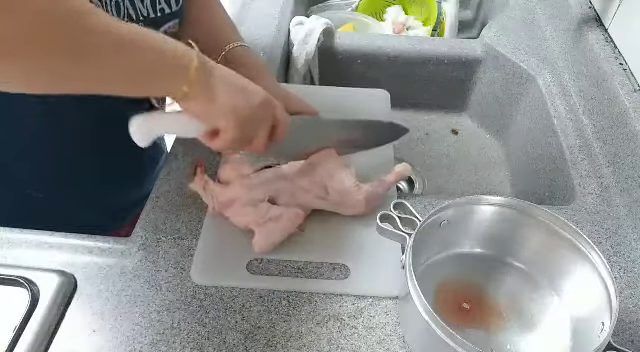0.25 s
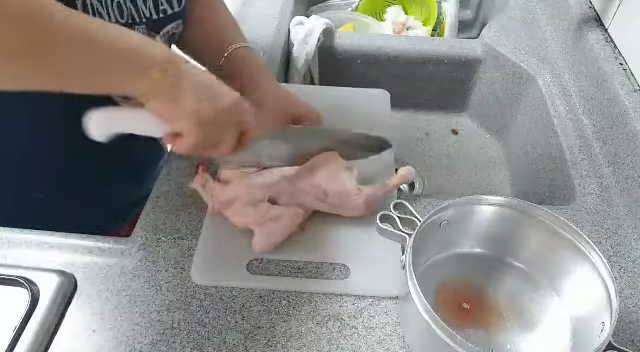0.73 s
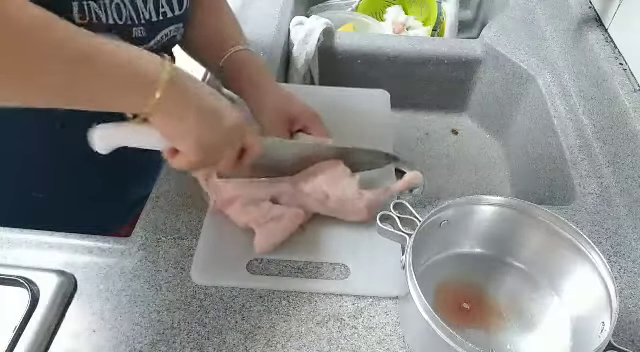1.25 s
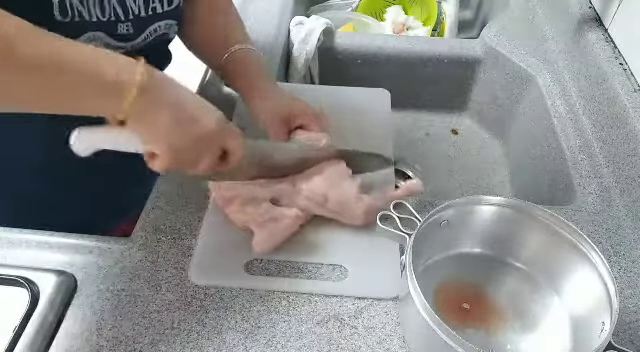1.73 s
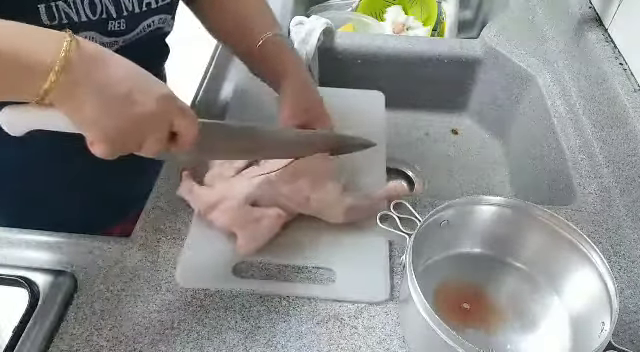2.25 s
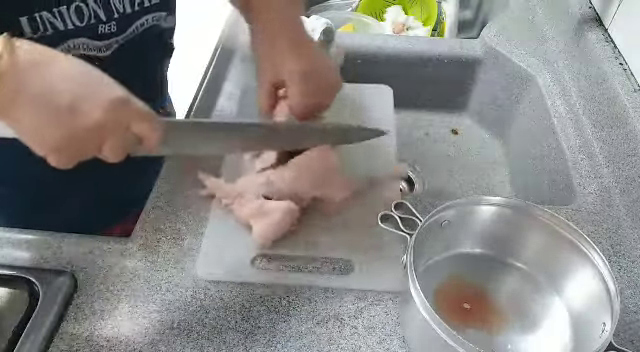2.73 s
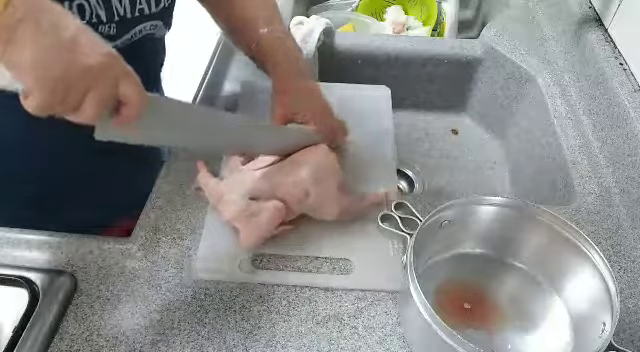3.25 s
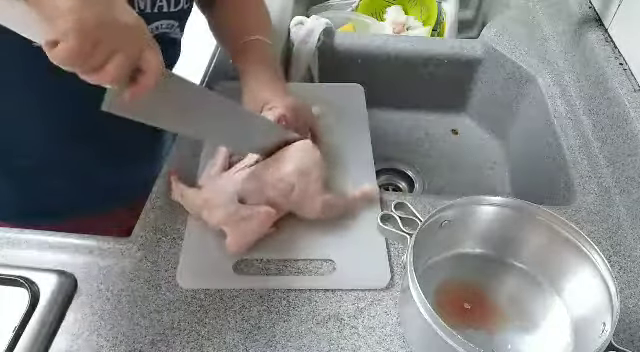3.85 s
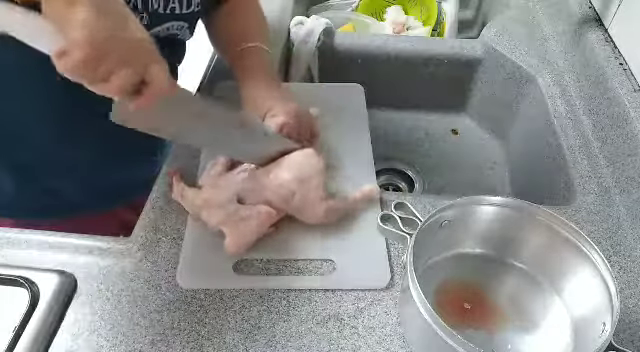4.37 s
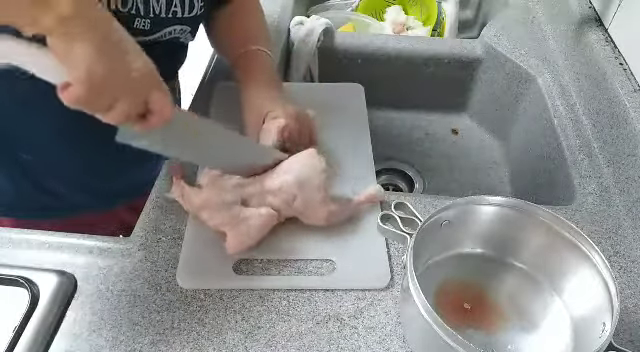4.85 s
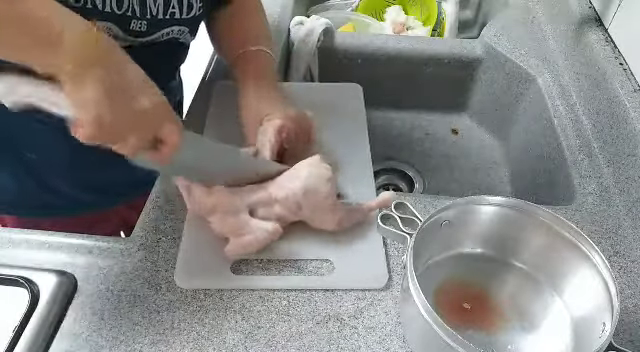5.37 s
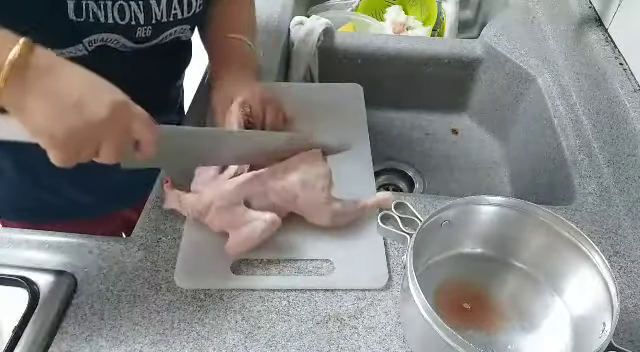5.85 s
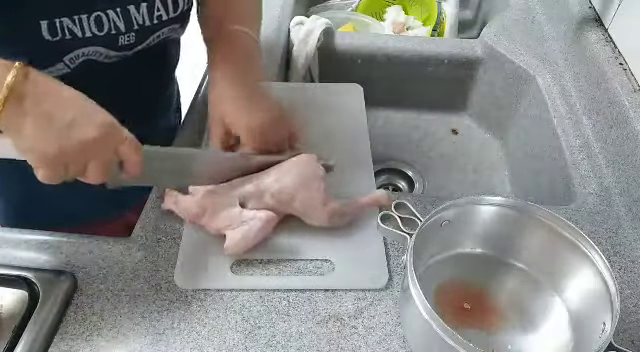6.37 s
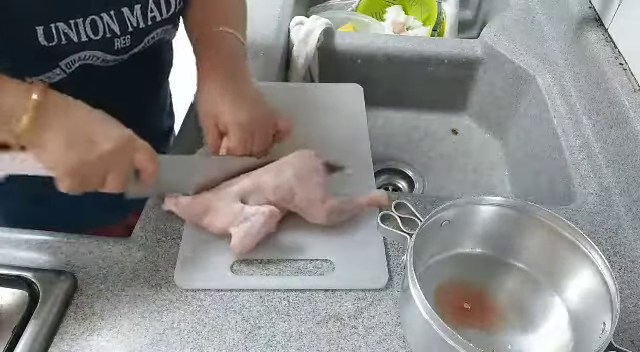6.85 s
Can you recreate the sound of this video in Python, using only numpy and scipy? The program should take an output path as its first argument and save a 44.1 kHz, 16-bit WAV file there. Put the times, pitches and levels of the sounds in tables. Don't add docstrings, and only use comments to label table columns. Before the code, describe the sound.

Over a soft kitchen hum, raw meat is cut with scratchy wet strokes, irregular board knocks, gristle ticks and one sharp bone snap.

```python
import sys
import numpy as np
from scipy import signal
from scipy.fft import rfft, irfft
from scipy.io import wavfile
from scipy.ndimage import uniform_filter1d

SR = 44100
rng = np.random.default_rng(int(sys.argv[2]) if len(sys.argv) > 2 else 0)


def makeup_ratio(level_db):
    decades = np.asarray(level_db, float) / 20
    return 10 ** decades


def int16_out(signal):
    q = np.round(np.clip(np.atleast_2d(signal).T, -1, 1) * 32767)
    wavfile.write(sys.argv[1], SR, q.astype(np.int16))


N = 313506
SPLIT_HZ = 8040


def rms_one(x):
    return x / np.sqrt(np.mean(x ** 2) + 1e-20)


def at_hz(points, hz):
    table_hz, value = np.array(points).T
    return np.interp(np.log(hz + 1), np.log(table_hz), value)


def coloured(spectrum, size=N):
    hz = np.fft.rfftfreq(size, 1 / SR)
    return rms_one(irfft(rfft(rng.standard_normal(size)) * makeup_ratio(at_hz(spectrum, hz)), size))


def band(x, low_hz, high_hz):
    return signal.sosfilt(signal.butter(2, [low_hz, min(high_hz, .45 * SR)], "band", fs=SR, output="sos"), x)


def resonance(x, hz, width_hz):
    r = np.exp(-np.pi * width_hz / SR)
    return signal.lfilter([(1 - r * r) / 2, 0, (r * r - 1) / 2], [1, -2 * r * np.cos(2 * np.pi * hz / SR), r * r], x)


def flicker(rate_hz):
    r = np.exp(-2 * np.pi * rate_hz / SR)
    return rms_one(signal.lfilter([1], [1, -2 * r, r * r], rng.standard_normal(N + SR))[SR:])


def patchy(x, gains_of):
    _, _, cells = signal.stft(x, nperseg=512)
    gains = gains_of(rng.random((33, cells.shape[1] // 4 + 1)))
    gains = np.kron(gains, np.ones((8, 4)))[:len(cells), :cells.shape[1]]
    return signal.istft(cells * gains, nperseg=512)[1][:N]


def add(out, s, sound):
    at = round(s * SR)
    out[at:at + len(sound)] += sound[:N - at]


def hum():
    # frequency [Hz], level [dB per Hz].
    rumble = [(15, -63), (25, -40), (97, 0), (159, -0.5), (202, -7), (368, -8.5), (483, -13), (1010, -16.5),
              (1390, -28), (1680, -16.5), (2460, -29), (4360, -29), (6380, -24), (14400, -32.5),
              (16500, -32)]
    # frequency [Hz], width [Hz], level [dB].
    whine_bands = [(1525, 200, -75.5), (6300, 140, -101.5), (8200, 270, -81), (10200, 670, -82),
                   (14350, 800, -80.5)]
    whine = sum(makeup_ratio(db) * rms_one(resonance(rng.standard_normal(N), hz, width_hz))
                for hz, width_hz, db in whine_bands)
    return makeup_ratio(-61 + .5 * flicker(9.2)) * coloured(rumble) + whine


def stray(mid):
    # frequency [Hz], level [dB per Hz].
    stray_spectrum = [(18, -43), (30, 2), (157, -9.5), (384, -5.5), (962, -5), (1960, -6), (2120, -5),
                      (4300, -2.5), (16000, -2)]
    side_db, mask_db = -73.5, -40.5
    silent_share, follows = .3, 1.1
    loudness = uniform_filter1d(mid ** 2, size=1024) / makeup_ratio(mask_db) ** 2
    patches = patchy(coloured(stray_spectrum), lambda draw: draw > silent_share)
    return makeup_ratio(side_db) * patches * np.sqrt(1 + follows * loudness) / (1 + loudness ** 4)


def kitchen(x):
    # frequency [Hz], t60 [s], level [dB].
    decay = [(100, 0.22, 18), (244, 0.56, 1.5), (690, 0.33, -1.5), (1500, 0.42, 0), (3000, 0.35, -3),
             (6000, 0.34, -4), (12000, 0.18, -3)]
    t, tail = np.arange(SR // 2) / SR, 0
    for low_hz in 60 * 2. ** np.arange(8):
        noise = band(rng.standard_normal(len(t)), low_hz, 2 * low_hz)
        level_db = at_hz(np.array(decay)[:, ::2], 1.4 * low_hz)
        t60 = at_hz(np.array(decay)[:, :2], 0.91 * low_hz)
        tail = tail + noise * makeup_ratio(level_db - 60 * t / t60)
    tail = tail * np.clip((t - .003) / 0.008, 0, 1)
    return signal.fftconvolve(x, tail / np.sqrt(np.sum(tail ** 2)))[:N]


def struck(hits, modes, spread_db, turns, crack_hz, crack_low_hz=380):
    out, t = np.zeros((2, N)), np.arange(SR // 2) / SR
    hz, level_db, t60 = np.transpose(modes)[:, :, None]
    swing = (1 - np.exp(-t * hz / turns)) * makeup_ratio(-np.minimum(60 * t / t60, 200)) * np.sin(2 * np.pi * hz * t)
    chance = rng.standard_normal((len(hits), len(modes), 1))
    edge = signal.butter(6, 11500, fs=SR, output="sos")
    crack_shape = (1 - np.exp(-t / 0.0067)) * makeup_ratio(-60 * t / 0.036)
    for (s, db, crack_db, cut_hz), luck in zip(hits, chance):
        strength = makeup_ratio(level_db + spread_db * luck) / np.sqrt(1 + (hz / cut_hz) ** 4)
        noise = signal.sosfilt(edge, band(rng.standard_normal(len(t)), crack_low_hz, crack_hz))
        add(out[0], s, makeup_ratio(db - 7.5) * np.sum(strength * swing, axis=0))
        add(out[1], s, makeup_ratio(crack_db) * rms_one(noise) * crack_shape)
    return out


def tapped(hits, modes):
    out, t = np.zeros(N), np.arange(SR // 5) / SR
    hz, level_db, t60 = np.transpose(modes)[:, :, None]
    swing = makeup_ratio(level_db - 60 * t / t60) * (1 - np.exp(-t * hz / 1.1)) * np.sin(2 * np.pi * hz * t)
    ring = np.sum(swing, axis=0)
    for s, db in hits:
        add(out, s, makeup_ratio(db) * ring)
    return out


def pings(rows, thin_hz=0):
    out = np.zeros(N)
    for s, db, hz, t60 in rows:
        t = np.arange(round(2 * t60 * SR)) / SR
        add(out, s, makeup_ratio(db + 4.5 - 60 * t / t60) * (1 - np.exp(-t * hz / 2.3)) * np.sin(2 * np.pi * hz * t))
    return np.diff(out, prepend=0) * SR / (2 * np.pi * thin_hz) if thin_hz else out


def meat_thumps():
    # start [s], peak [dB], crack [dB], contact cut-off [Hz].
    thumps = [
        (.94, -41, -80, 150),
        (3.020, -32.5, -85, 307),
        (3.0333, -36, -85, 300),
        (3.040, -44, -85, 300),
        (4.565, -42, -80, 200),
        (4.59, -41.5, -80, 200),
        (5.99, -65, -78, 300),
        (6.29, -67, -73, 300),
        (6.80, -58, -68, 400),
    ]
    # frequency [Hz], level [dB], t60 [s].
    basin = [(147, 11, 0.042), (200, 9, 0.04), (390, -5, .05)]
    return struck(thumps, basin, 1.0, turns=0.61, crack_hz=3000)


def board_knocks():
    # start [s], peak [dB], crack [dB], contact cut-off [Hz].
    knocks = [
        (0.565, -24.5, -30, 1500),
        (0.981, -28.5, -54, 1500),
        (1.315, -33.5, -32, 1500),
        (2.273, -49.5, -54, 1500),
    ]
    # frequency [Hz], level [dB], t60 [s].
    board = [(120, -2.5, 0.086), (150, 1, 0.074), (243, 9.5, 0.07), (545.6, 0, 0.088), (900, 12, 0.019),
             (963, -4.5, 0.083), (1500, 16, 0.011), (2210, -1, 0.041), (2790, -10, 0.1)]
    return struck(knocks, board, 0.97, turns=2.83, crack_hz=3500)


def rim_slaps():
    # start [s], peak [dB], crack [dB], contact cut-off [Hz].
    slaps = [
        (2.703, -23, -24, 3000),
        (2.709, -38, -34, 3000),
        (2.716, -32, -35, 1000),
        (2.727, -23, -32, 900),
    ]
    # frequency [Hz], level [dB], t60 [s].
    rim = [(150, -0.5, 0.057), (234.4, -4, 0.11), (345, -5.5, 0.036), (453, -17.5, 0.21), (554, 1.5, 0.047),
           (627, -6.5, 0.16), (678, 1.5, 0.11), (746, 1, 0.031), (1000, -7, 0.022), (1310, -2.5, 0.03),
           (1570, 1.5, 0.034), (2500, -13, 0.028)]
    return struck(slaps, rim, 1.0, turns=1.9, crack_hz=10600)


def booms():
    # start [s], peak [dB], pitch [Hz], t60 [s].
    boom_events = [(.5652, -33, 880, .03), (.9635, -41, 944, .03), (.981, -51, 87, .12),
                   (.986, -36, 547, .06), (1.266, -49, 1000, .04), (1.288, -56, 1000, .08),
                   (1.316, -43.5, 108, .15), (2.73, -42, 645, 0.15), (2.765, -45.5, 690, .15),
                   (2.275, -57, 793, .08), (3.020, -46, 192, .04), (5.4545, -19, 2130, 0.0042),
                   (5.455, -32.5, 271, 0.064), (5.458, -29, 615, .08), (5.4722, -21, 7050, .012),
                   (5.50, -43, 1240, .06), (5.51, -41, 710, .12), (5.54, -43, 150, .1),
                   (6.295, -56, 129, .08), (6.778, -42.5, 934, .05)]
    return pings(boom_events)


def heel_taps():
    # start [s], peak [dB].
    taps = [
        (.0972, -39),
        (.0995, -52),
        (.141, -45),
        (.1525, -43),
        (.207, -49.5),
        (.522, -48),
        (.537, -42),
    ]
    # frequency [Hz], level [dB], t60 [s].
    heel = [(895, 4.5, 0.025), (1656, -2, 0.024), (2374, -12, 0.028), (2660, -16, 0.033)]
    return tapped(taps, heel)


def bone_break():
    # start [s], peak [dB], crack [dB], contact cut-off [Hz].
    breaks = [
        (5.4525, -15.5, -27, 2000),
        (5.4570, -14.5, -20.5, 2500),
        (5.460, -29, -51, 2500),
    ]
    # frequency [Hz], level [dB], t60 [s].
    bone = [(140, -7.5, 0.12), (210, -5, 0.037), (659, -35, 0.029), (860, -5, 0.01), (870, -5, 0.024),
            (1000, -11, 0.014), (1106, 2, 0.013), (1250, -4.5, 0.025), (1730, -1, 0.0089),
            (1850, -4, 0.012), (2200, 10, 0.0088), (4400, -2, 0.0082)]
    return struck(breaks, bone, 0.83, turns=0.36, crack_hz=2000)


def bone_snap():
    centre_s, width_s, lean = 5.45672, .00019, .25
    t = (np.arange(N) / SR - centre_s) / width_s
    return makeup_ratio(-7.5) * (t ** 2 - 1 - lean * t) * np.exp(-.5 * t ** 2)


def bone_splinters():
    # start [s], peak [dB].
    splinters = [
        (5.4535, -25.5),
        (5.464, -31),
        (5.469, -35),
        (5.477, -42),
        (5.503, -38),
    ]
    # frequency [Hz], level [dB], t60 [s].
    shard = [(660, 0, 0.05), (783, 4, 0.026), (1050, 8.5, 0.019), (1677, 2.5, 0.042), (2191, -4, 0.02),
             (3470, -3, 0.02), (4430, -8, 0.016)]
    return tapped(splinters, shard)


def steel_chatter():
    # start [s], peak [dB], crack [dB], contact cut-off [Hz].
    chatter = [
        (5.4668, -21.5, -38, 12000),
        (5.470, -18.5, -36, 12000),
        (5.478, -24, -20, 12000),
        (5.486, -25.5, -31, 12000),
        (5.495, -36, -22.5, 12000),
        (5.503, -37, -18, 12000),
    ]
    # frequency [Hz], level [dB], t60 [s].
    steel = [(2950, 1.5, 0.024), (3556, 3.5, 0.025), (5440, -18, 0.021), (6020, -6, 0.048),
             (7005, 6, 0.035), (7150, 15.5, 0.011), (7800, 0, 0.0244), (8270, -12.5, 0.075)]
    return struck(chatter, steel, 0.7, turns=3.8, crack_hz=9100, crack_low_hz=2440)


def fibre_pricks():
    # start [s], peak [dB], pitch [Hz].
    pricks = [(0.1684, -39, 10770), (0.2173, -35, 14560), (0.5585, -29, 14380), (0.5613, -31, 14040),
              (0.9024, -35, 9820), (0.9075, -34, 8700), (0.9097, -34, 13870), (1.0893, -44, 7060),
              (1.1707, -46, 5680), (1.2859, -40, 8270), (1.3136, -39, 7920), (1.3344, -33, 5250),
              (1.3622, -38, 4820), (2.7079, -25, 8790), (2.7278, -39, 7670), (2.7595, -44, 7580),
              (3.8062, -45, 7920), (3.8134, -42, 7240), (3.8273, -39, 15590), (4.5872, -24, 8180),
              (4.6075, -32, 4570), (4.6253, -23, 10590), (4.6569, -41, 8870), (5.3838, -41, 10340),
              (5.4109, -40, 11110), (5.4131, -37, 13700), (5.4225, -34, 11540), (5.4383, -29, 11970),
              (5.4547, -20, 4220), (5.5312, -30, 6890), (5.5626, -35, 6630), (5.5735, -36, 6980),
              (5.6019, -46, 6200), (6.6776, -37, 7670), (6.7362, -19, 7490), (6.7647, -32, 8610),
              (6.7707, -33, 9390), (6.7809, -25, 8350), (6.7829, -25, 9130), (6.7993, -31, 8870),
              (6.8158, -33, 6030), (6.8503, -34, 9560), (6.8612, -38, 10680), (6.8808, -43, 7410)]
    cycles = 15
    return pings([(s, db, hz, cycles / hz) for s, db, hz in pricks], thin_hz=8000)


def snags():
    # start [s], peak [dB], pitch [Hz], top [dB], knock [dB].
    gristle = [(0.0935, -53, 8910, -66, -57), (0.144, -53, 8550, -59, -55), (0.207, -36, 8500, -41, -65),
               (0.5198, -26.5, 7150, -41, -44.5), (0.527, -43, 7600, -34, -48),
               (0.555, -42, 6400, -35, -52), (0.903, -43, 8620, -36, -46.5), (0.9408, -28, 5300, -30, -49),
               (0.9638, -25, 7800, -33, -45), (1.273, -32, 8200, -48, -62), (1.333, -30, 5100, -55, -46.5),
               (1.6464, -32.5, 6200, -40.5, -56), (1.7377, -36, 7140, -46, -57.5),
               (3.8055, -40, 7100, -49, -60), (3.8188, -39, 6300, -43, -48.5),
               (4.559, -24.5, 3680, -31.5, -44.5), (4.581, -20.5, 8200, -29.5, -42),
               (4.986, -36, 8250, -45, -53), (6.7352, -18.5, 8250, -24.5, -69),
               (6.779, -21.5, 8600, -26, -56)]
    # start [s], peak [dB], pitch [Hz], top [dB].
    ticks = [(0.166, -45, 9100, -42.5), (0.2158, -37, 8400, -41.5), (2.5446, -44, 5660, -49.5),
             (2.629, -40.5, 5000, -67), (2.6563, -42, 5060, -51.5), (3.632, -48, 8370, -58),
             (3.864, -40.5, 7960, -50), (4.49, -48, 5000, -54), (4.5034, -44, 3400, -45),
             (4.62, -33, 8250, -31.5), (5.379, -56, 8510, -46.5), (6.674, -34, 6460, -51),
             (6.831, -27, 5530, -31), (7.0884, -43, 5030, -80)]
    # time [s], pitch [Hz].
    grip = [
        (0, 950),
        (.55, 895),
        (1.3, 963),
        (1.75, 1020),
        (3.82, 860),
        (4.56, 900),
        (5, 1000),
    ]
    tick_knock_db, grip_spread = -44, 0.016
    out, t = np.zeros((2, N)), np.arange(SR // 5) / SR
    shape = (1 - np.exp(-t / 0.0031)) * (makeup_ratio(-60 * t / 0.03) + 0.23 * makeup_ratio(-60 * t / 0.075))
    swell = t / .004 * np.exp(1 - t / .004)
    for s, db, hz, top_db, knock_db in gristle + [(*row, row[1] + tick_knock_db) for row in ticks]:
        knock_hz = np.interp(s, *np.transpose(grip)) * (1 + grip_spread * rng.standard_normal())
        knock = np.sin(2 * np.pi * knock_hz * t) + 0.36 * np.sin(2 * np.pi * 1.7 * knock_hz * t)
        add(out[0], s, makeup_ratio(knock_db + 2.0) * swell * knock)
        noise = rng.standard_normal((2, len(t)))
        broad = rms_one(band(noise[0], np.clip(0.81 * hz, 2800, 4800), SPLIT_HZ))
        middle = broad + 1.48 * rms_one(resonance(noise[0], hz, 400))
        top = rms_one(band(noise[1], SPLIT_HZ, 15400))
        grit = makeup_ratio(3 * np.repeat(rng.standard_normal(len(t) // 30), 30))
        add(out[1], s, shape * grit * (makeup_ratio(db - 13.5) * middle + makeup_ratio(top_db + 1.5) * top))
    return out


def songs(noise):
    # start [s], length [s], pitch [Hz], level [dB].
    song_events = [(0.106, 0.022, 1630, -57), (0.513, 0.0074, 7200, -50), (.966, 0.013, 8000, -42),
                   (1.343, 0.023, 4920, -47), (1.343, .012, 5700, -46), (1.343, .012, 4350, -48),
                   (1.36, .02, 6200, -54), (1.252, .01, 5100, -58), (1.275, .006, 8800, -52),
                   (1.297, 0.0072, 8200, -54), (4.522, .02, 3270, -52), (4.554, 0.034, 5300, -53),
                   (4.56, .04, 3990, -49), (4.584, .012, 8400, -43), (5.453, .004, 4450, -37),
                   (5.482, 0.03, 5980, -35), (5.483, 0.0074, 2890, -37), (5.522, 0.03, 7020, -44),
                   (5.555, .03, 6800, -49), (6.63, .07, 5440, -60), (6.628, .03, 4500, -64),
                   (6.735, .022, 1570, -52), (6.645, 0.02, 3600, -62), (6.66, 0.034, 4240, -59),
                   (6.672, .018, 7100, -50), (6.672, .014, 8300, -51), (6.66, .045, 5500, -56),
                   (6.672, .02, 4400, -52), (6.736, 0.07, 11000, -44), (6.736, .004, 7900, -35),
                   (6.7795, .005, 8630, -37), (6.779, .006, 3540, -50), (6.8315, .012, 5270, -43)]
    width_hz, attack_s, release_db_per_s = 320, .003, 1496.5
    out, lead = np.zeros(N), SR // 10
    for s, length, hz, db in song_events:
        t = np.arange(round((length + .08) * SR)) / SR
        near = noise[round(s * SR) - lead:][:lead + len(t)]
        line = rms_one(resonance(resonance(near, hz, width_hz), hz, width_hz))[lead:]
        release_db = release_db_per_s * np.maximum(t - length, 0)
        add(out, s, makeup_ratio(db - release_db) * np.minimum(t / attack_s, 1) * line)
    return out


def singing(hiss):
    # frequency [Hz], width [Hz], level [dB].
    blade = [(3400, 24, -16), (4340, 210, -12.5), (5170, 240, 0), (7840, 580, -4.5), (8250, 79, -18),
             (10700, 330, 0.5)]
    return sum(makeup_ratio(db + 6 * flicker(5)) * resonance(hiss, hz, width_hz) for hz, width_hz, db in blade)


def carcass(x):
    # frequency [Hz], width [Hz], level [dB].
    peaks = [(400, 1280, 1), (880, 215, 10.5), (1240, 890, -5.5), (1560, 140, 7), (2170, 450, -8)]
    signs = (-1) ** np.arange(len(peaks))
    return rms_one(sum(sign * makeup_ratio(db) * resonance(x, hz, width_hz)
                       for sign, (hz, width_hz, db) in zip(signs, peaks)))


def pressure(rows, attack_s, sag_db_per_s, release_db_per_s):
    gains = np.zeros((3, N))
    for s, length, hiss_db, top_db, body_db in rows:
        t = np.arange(round((length + .25) * SR)) / SR
        fall_db = sag_db_per_s * t + release_db_per_s * np.maximum(t - length, 0)
        shape = np.minimum(t / attack_s, 1) * makeup_ratio(-fall_db)
        for gain, db in zip(gains, (hiss_db, hiss_db + top_db, hiss_db + body_db)):
            add(gain, s, makeup_ratio(db) * shape)
    return gains


def pushes():
    # start [s], length [s], hiss [dB], top share [dB], body share [dB].
    push_events = [(0.095, 0.14, -57.5, 4.5, 2.5), (.497, 0.0076, -67, 7, -7), (0.515, 0.051, -50.5, 9, 1),
                   (0.557, 0.027, -49, -13, 3), (0.902, 0.04, -52, 9.5, 3.5), (.942, 0.045, -47, -1, 3),
                   (1.333, 0.018, -43, -16, -9), (1.645, 0.074, -54.5, -3, -4),
                   (1.737, 0.0048, -52, -17, -5), (3.8, 0.095, -63.5, -12, 2), (4.549, .01, -54, 6, -8),
                   (4.6215, 0.0046, -53, 5, -10), (4.59, 0.03, -56.5, -10, -1),
                   (4.988, 0.0077, -49, -0.5, -6), (5.38, 0.073, -62.5, 13, 2), (5.41, 0.034, -53, 9, 2.5),
                   (5.432, 0.023, -37.5, 2.5, -1), (5.457, 0.011, -34.5, -5, -8.5),
                   (5.475, 0.071, -55, -7, 14.5), (6.7355, 0.046, -40.5, -12, -9),
                   (6.779, 0.067, -41.5, -3, -7)]
    return pressure(push_events, attack_s=0.0027, sag_db_per_s=35.5, release_db_per_s=507)


def draws():
    # start [s], length [s], hiss [dB], top share [dB], body share [dB].
    draw_events = [(.325, 0.11, -66, 10, -14), (.7, 0.1, -65.5, 10.5, -4), (1.07, 0.089, -53, 3.5, -14),
                   (1.25, 0.089, -49, 2.5, -2.5), (1.47, 0.18, -61, 6, -5), (1.77, 0.13, -82, 5, -2),
                   (2.26, 0.25, -72, 4, 10), (2.53, 0.46, -66.5, 1, -2), (2.99, 0.35, -67.5, 5, 1.5),
                   (3.36, 0.15, -66, 2, -10), (3.62, 0.058, -71.5, 6, 2.5), (3.9, 0.16, -78, 10, 11),
                   (4.08, 0.18, -61.5, 1, -3), (4.31, 0.066, -62.5, -1.5, -6), (4.725, 0.1, -62, 8.5, -4),
                   (4.87, 0.15, -70, 9, 7.5), (5.02, 0.079, -70, -13, -12), (5.19, 0.1, -66.5, 6, -3),
                   (5.74, 0.086, -66, -24, -1), (6.04, .08, -83, -2, 8), (6.97, 0.085, -60.5, -2.5, -27)]
    return pressure(draw_events, attack_s=0.022, sag_db_per_s=19.5, release_db_per_s=305)


def strain():
    # moment of giving [s], climb [s], hiss [dB], top share [dB], body share [dB].
    strains = [
        (2.705, 0.013, -36.5, -13, 1.5),
        (3.82, 0.05, -57, 9, -15),
        (4.551, 0.12, -47.5, -5, -6.5),
        (4.587, 0.066, -34, -9, -5.5),
        (5.452, 0.006, -26, -16, -7.5),
        (6.684, 0.1, -44.5, -9, -12.5),
    ]
    climb_db, release_db_per_s = 33.5, 700
    gains = np.zeros((3, N))
    for s, climb, hiss_db, top_db, body_db in strains:
        t = np.arange(round((climb + .1) * SR)) / SR - climb
        shape = makeup_ratio(climb_db * np.minimum(t, 0) / climb - release_db_per_s * np.maximum(t, 0))
        for gain, db in zip(gains, (hiss_db, hiss_db + top_db, hiss_db + body_db)):
            add(gain, s - climb, makeup_ratio(db) * shape)
    return gains


def strokes():
    # frequency [Hz], level [dB per Hz].
    friction = [(1470, -14.5), (2500, -11.5), (2720, -11.5), (3630, -0.5), (4170, -4), (8400, -4.5),
                (9510, -5), (14000, -8), (16000, -9.5)]
    wet_db = 4
    grain = makeup_ratio(0.4 * flicker(87) + 1.0 * flicker(23))
    hiss = coloured(friction)
    sung = songs(hiss)
    hiss = patchy(hiss + makeup_ratio(-9.5) * singing(hiss), lambda draw: makeup_ratio(wet_db * np.sqrt(12) * (draw - .5)))
    top = signal.sosfilt(signal.butter(4, SPLIT_HZ, "high", fs=SR, output="sos"), hiss)
    middle = signal.sosfilt(signal.butter(4, SPLIT_HZ, fs=SR, output="sos"), hiss)
    layers = np.array([rms_one(middle), rms_one(top), carcass(rng.standard_normal(N))])
    gains = pushes() + draws() + strain()
    return makeup_ratio(-5.0) * grain * np.array([sung, np.sum(gains * layers, axis=0)])


def scene():
    no_deep_bass = signal.butter(3, 75, "high", fs=SR, output="sos")
    blows = meat_thumps() + board_knocks() + rim_slaps() + bone_break() + steel_chatter() + snags()
    rings, cracks = signal.sosfilt(no_deep_bass, blows)
    small_rings = booms() + heel_taps() + bone_splinters()
    rings = rings + bone_snap() + signal.sosfilt(no_deep_bass, small_rings)
    cracks = cracks + fibre_pricks()
    rings, cracks = np.array([rings, cracks]) + strokes()
    room = makeup_ratio(-6.5) * kitchen(cracks + makeup_ratio(-9) * rings)
    mid = rings + cracks + room + hum()
    side = stray(mid)
    return np.array([mid + side, mid - side])


def starve_bands(heard):
    # start [s], length [s], depth [dB], low edge [Hz], high edge [Hz].
    gaps = [(.494, .005, -12, 2200, 17000), (.518, .009, -25, 2100, 4000), (.538, .018, -12, 1500, 4500),
            (.547, .009, -14, 4500, 7200), (.549, .007, -8, 8200, 12000), (.889, .007, -26, 2000, 17000),
            (1.633, .007, -12, 2200, 17000), (2.715, .08, -10, 12500, 17000),
            (4.976, .009, -10, 2200, 17000), (4.47, .18, -10, 2200, 2600), (5.369, .009, -18, 2200, 17000),
            (5.468, .13, -5, 12500, 17000), (6.718, .008, -30, 60, 17000), (6.726, .008, -2, 2200, 17000),
            (6.741, .018, -22, 300, 1350), (6.741, .02, -12, 1750, 3300), (6.745, .04, -14, 2050, 2350),
            (6.745, .04, -12, 2750, 3050), (.912, .01, -10, 3000, 5500), (.935, .005, -14, 2800, 7200),
            (4.53, .05, -14, 1700, 1950), (4.48, .03, -10, 2200, 2900), (1.32, .06, -6, 2400, 3600),
            (.097, .03, -9, 4000, 4700), (6.655, .04, -10, 12500, 13100), (.545, .011, -10, 12000, 14000),
            (.538, .007, -14, 1500, 2600)]
    margin_s = .03
    for s, length, db, low_hz, high_hz in gaps:
        at, size = round((s - margin_s) * SR), round((length + 2 * margin_s) * SR)
        t = np.arange(size) / SR - margin_s
        loss = uniform_filter1d((1 - makeup_ratio(db)) * ((t > 0) & (t < length)), size=40)
        band_pass = signal.butter(4, [low_hz, high_hz], "band", fs=SR, output="sos")
        heard[:, at:at + size] -= loss * signal.sosfiltfilt(band_pass, heard[:, at:at + size])
    return heard


def low_pass(x):
    return signal.sosfilt(signal.butter(12, 16990, fs=SR, output="sos"), x)


def record(dry):
    heard = signal.sosfilt(signal.cheby2(14, 40, 16050, fs=SR, output="sos"), dry)
    return low_pass(starve_bands(heard))


dry = scene()
out = record(dry)
int16_out(out)
```